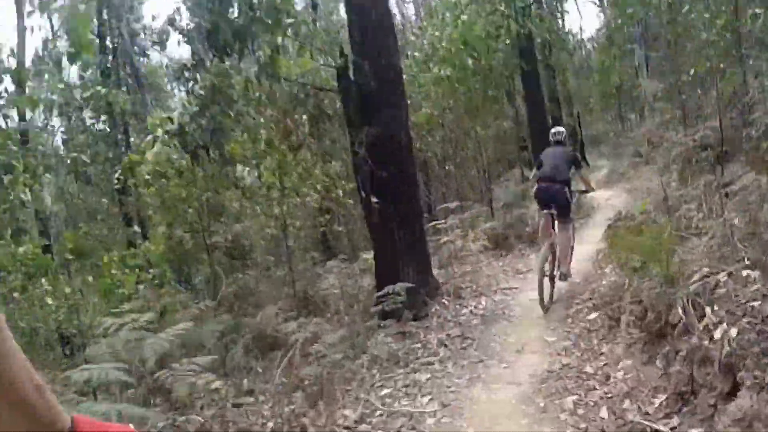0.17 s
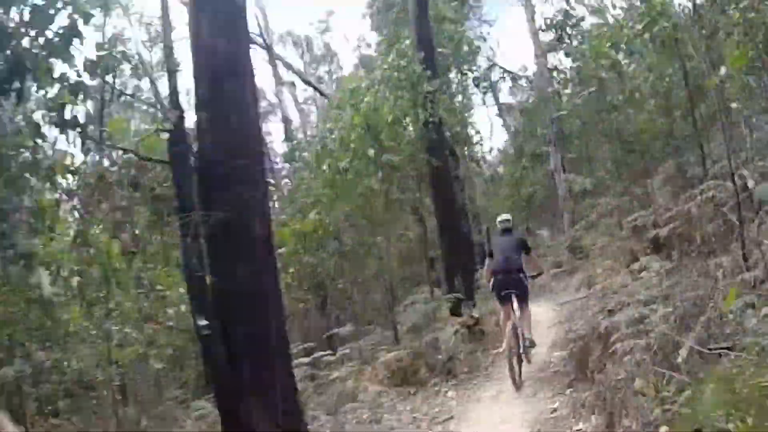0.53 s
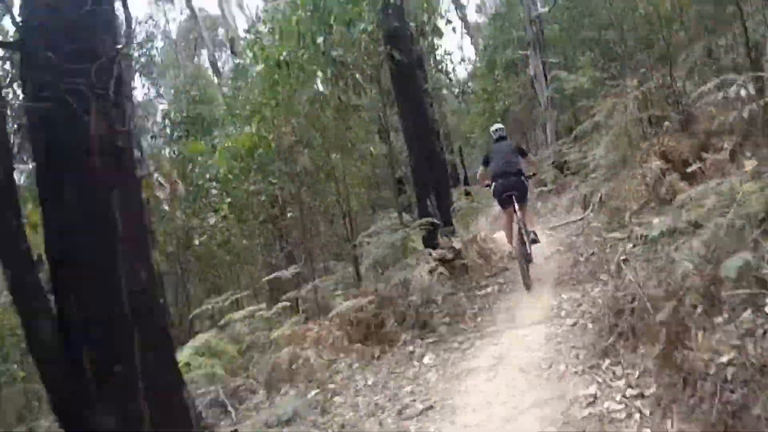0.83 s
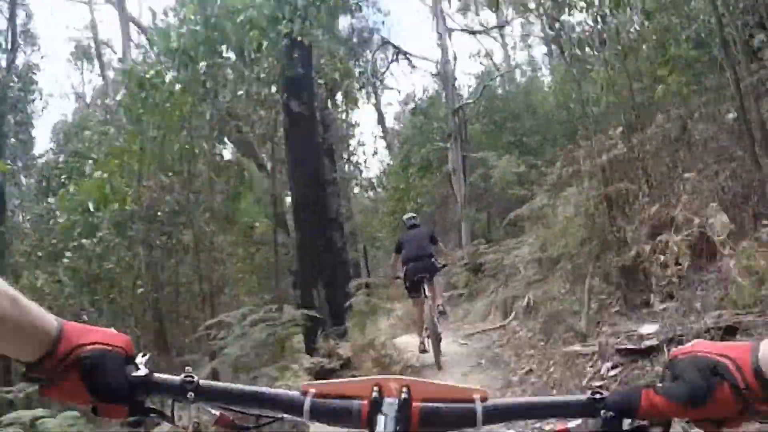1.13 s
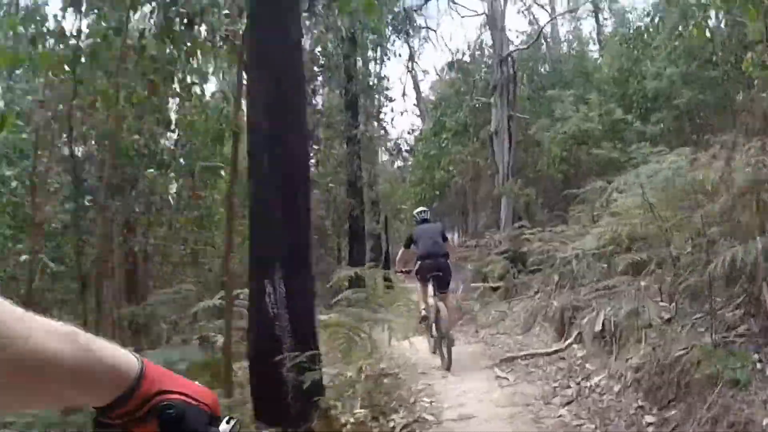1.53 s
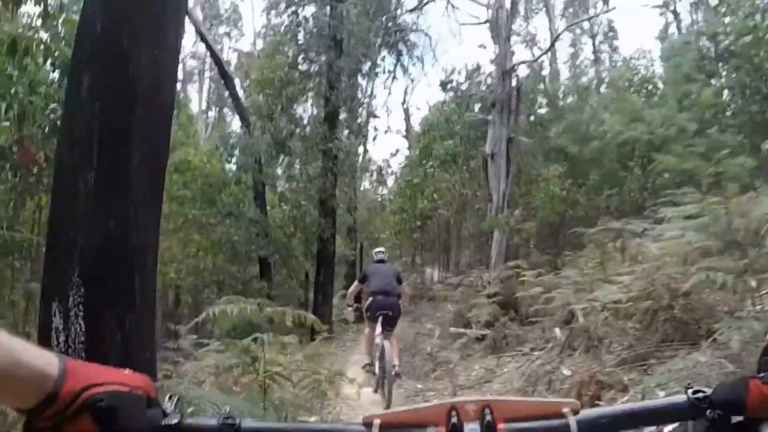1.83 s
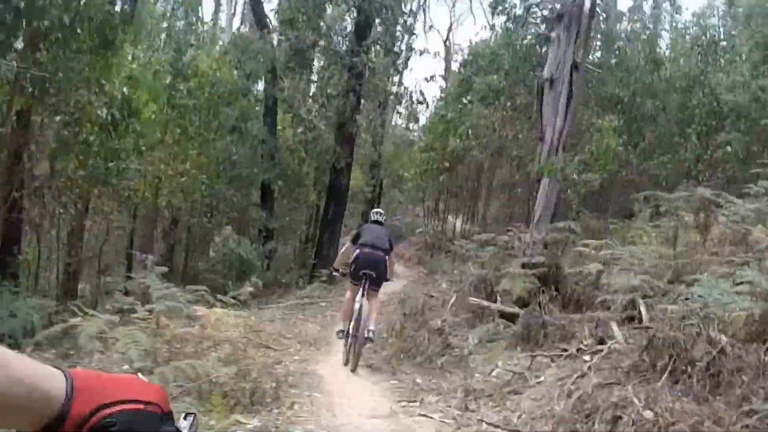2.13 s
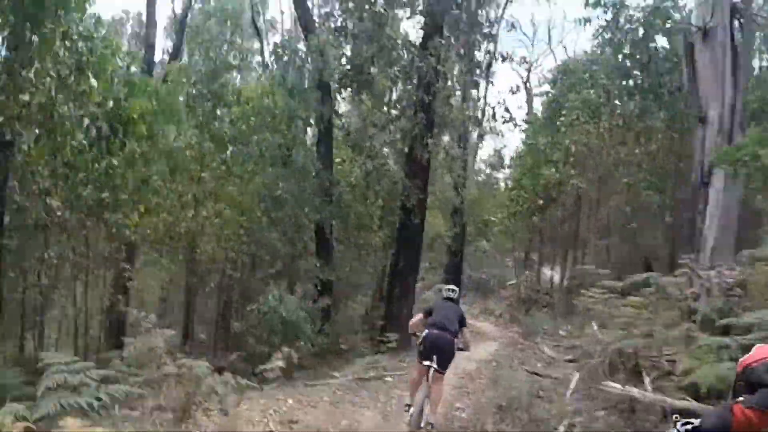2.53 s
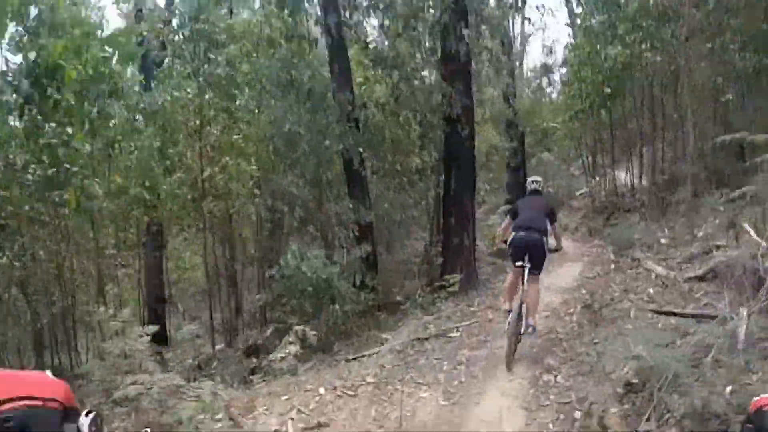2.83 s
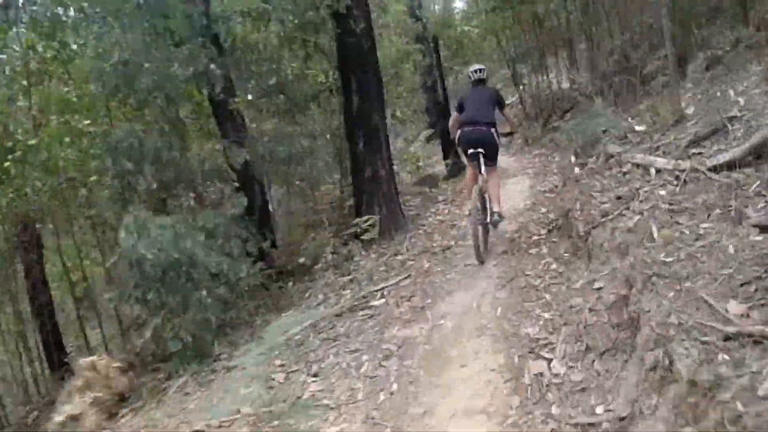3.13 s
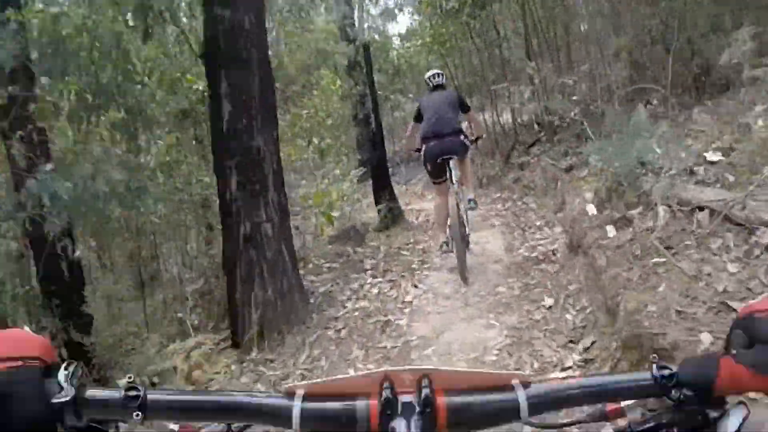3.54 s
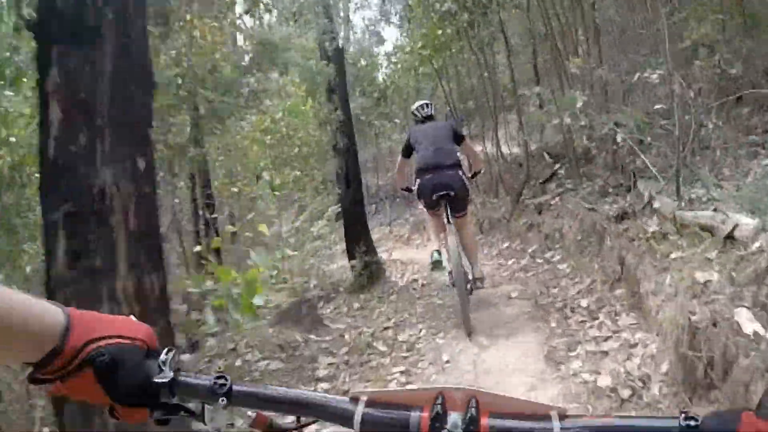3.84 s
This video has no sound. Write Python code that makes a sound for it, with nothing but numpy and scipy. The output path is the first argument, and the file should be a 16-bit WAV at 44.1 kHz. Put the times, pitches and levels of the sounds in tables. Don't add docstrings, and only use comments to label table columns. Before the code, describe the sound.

Mountain bike on a forest trail, close and muffled in a camera case: low wind buffeting, gritty tyres, twig and cable ticks, sudden low bumps and mount knocks, clustered early and again after three seconds.

```python
import sys
import numpy as np
from scipy import signal
from scipy.io import wavfile
from scipy.ndimage import uniform_filter1d

SR = 44100
rng = np.random.default_rng(int(sys.argv[2]) if len(sys.argv) > 2 else 0)


def unload_audio(sound):
    columns = np.transpose(np.atleast_2d(sound))
    steps = np.round(np.clip(columns, -1, 1) * 32767)
    wavfile.write(sys.argv[1], SR, steps.astype(np.int16))


def level_to_linear(level):
    exponent = np.asarray(level, float) / 20
    return 10 ** exponent


N = 174195

# [t/s, level/dB]
GUSTS = [(0, -65.5), (.35, -65.5), (.5, -60), (.7, -64.5), (1.0, -62.5), (1.4, -62.5), (1.65, -65),
         (1.82, -62), (1.95, -66.5), (2.12, -66), (2.45, -66), (2.6, -65.5), (2.85, -66.5), (3.5, -62),
         (3.72, -66.5), (3.95, -67)]
# [f/Hz, level per Hz/dB]
WIND_SPECTRUM = [(4.7, -30), (8.0, 6.5), (37, -1), (51, -23), (82, -17), (545, -41.5), (1000, -41.5),
                 (1300, -74), (2200, -120)]
# [t/s, level/dB]
PEDALLING = [(0, -82.5), (.3, -86), (.7, -86), (.88, -83.5), (1.0, -76.5), (1.09, -79), (1.14, -89.5),
             (2.0, -94.5), (2.9, -93), (3.1, -84.5), (3.4, -77.5), (3.6, -80), (3.95, -79.5)]
# [f/Hz, width/Hz, level/dB]
CHAIN_MODES = [(1670, 260, -12), (1920, 730, -6.5), (2674, 415, 4.5), (3000, 910, -8.5), (3604, 250, 5),
               (4414, 560, -6.5), (5670, 2180, -13.5), (5760, 230, -24), (6640, 320, -7.5),
               (7160, 320, -14), (8780, 780, -22), (10580, 300, -19), (11600, 240, -19),
               (10100, 4800, -28.5)]
# [t/s, level/dB]
ROLLING = [(0.0, -74), (0.36, -71), (1.91, -75), (2.13, -76), (2.55, -74.5), (2.86, -76), (3.15, -71.5),
           (3.34, -70), (3.95, -75.5)]
# [f/Hz, width/Hz, level/dB]
CASE_MODES = [(690, 53, -8.5), (1110, 820, -21.5), (1468, 162, 4), (2146, 153, 3), (2860, 140, -4),
              (3584, 97, 2.5), (4400, 450, -14.5), (5490, 240, -14.5), (6780, 1000, -24), (9700, 4200, -34)]
# [t/s, peak level/dB, treble level/dB, dull f/Hz]
TICKS = [(.085, -57, -75, 2900), (.161, -59, -64, 1600), (.24, -53, -70, 1910), (.272, -47, -59, 1640),
         (.2955, -47, -70, 2090), (.3935, -46, -64, 1580), (.4085, -45, -57, 2220), (.426, -42, -54, 2280),
         (.438, -43, -60, 2200), (.567, -52, -52, 2100), (.594, -70, -60, 2000), (.663, -53, -60, 2900),
         (.698, -52, -58, 2900), (.7565, -51, -48, 1850), (.894, -57, -75, 1520), (.94, -55, -75, 1600),
         (1.128, -61, -57, 2300), (1.291, -66, -63, 2200), (1.4441, -57, -57, 3700),
         (1.597, -57, -70, 2290), (1.7315, -56, -70, 2270), (1.9594, -70, -63, 2200),
         (1.976, -62, -55, 2200), (2.176, -57, -72, 1710), (2.1964, -63, -61, 2600), (2.21, -61, -64, 2600),
         (2.226, -60, -75, 2000), (2.331, -56, -75, 1610), (2.364, -59, -66, 1520),
         (2.3845, -55, -70, 2250), (2.527, -59, -70, 2400), (2.553, -58, -75, 2720),
         (2.722, -60, -72, 1390), (2.7576, -75, -66, 2000), (2.789, -57, -68, 1440),
         (2.856, -54, -65, 2200), (2.868, -56, -61, 2700), (2.974, -63, -65, 2700), (3.002, -60, -62, 2630),
         (3.0485, -61, -64, 2600), (3.077, -59, -66, 1630), (3.2335, -58, -60, 2800),
         (3.259, -46, -63, 2000), (3.301, -41, -60, 2030), (3.3343, -42, -62, 2050),
         (3.449, -45, -48, 2270), (3.544, -58, -70, 1500), (3.918, -60, -61, 2700), (3.929, -54, -70, 2640)]
# [f/Hz, width/Hz, level/dB]
TICK_CASE_MODES = [(1670, 140, -2.3), (2280, 190, -0.33), (2660, 340, -2.0), (3890, 190, 1)]
# [f/Hz, width/Hz, level/dB]
TWIG_MODES = [(3480, 450, 10.5), (4740, 1000, -9.5), (5000, 200, -3), (6700, 1100, 0), (9400, 2900, -10.5),
              (12100, 3400, -25)]
# [t/s, peak level/dB, length/s]
JOLTS = [(0.208, -35.5, 0.015), (0.329, -38, 0.016), (0.529, -28, 0.016), (0.548, -29.5, 0.023),
         (0.593, -31.5, 0.016), (0.663, -46, 0.031), (0.843, -41, 0.016), (0.948, -35.5, 0.023),
         (0.987, -38, 0.024), (1.115, -35.0, 0.018), (1.213, -35.0, 0.02), (1.286, -42, 0.016),
         (1.368, -34.5, 0.034), (1.489, -35, 0.032), (1.575, -39.5, 0.069), (1.783, -27.5, 0.024),
         (1.914, -34.5, 0.029), (2.098, -36.5, 0.026), (2.402, -40.5, 0.024), (2.65, -34, 0.037),
         (2.977, -40.5, 0.025), (3.174, -46, 0.038), (3.309, -40, 0.0082), (3.402, -39.5, 0.01),
         (3.432, -37, 0.02), (3.482, -27.5, 0.015), (3.597, -32.5, 0.018), (3.687, -39, 0.031)]
# [t/s, peak level/dB, length/s]
PULL = (0.46, -34, 0.022)
# [start t/s, length/s, level/dB]
RUBS = [(0.228, 0.037, -61.5), (0.276, 0.032, -62.5), (0.388, 0.062, -56.5), (0.403, 0.034, -54.5),
        (0.448, 0.067, -64), (0.519, 0.029, -57.5), (0.551, 0.029, -62.5), (1.181, .049, -68),
        (1.288, .03, -67.5), (1.344, 0.039, -69), (1.591, 0.021, -65), (1.651, 0.033, -66),
        (1.725, 0.048, -62), (1.77, 0.028, -58.5), (1.811, 0.053, -64), (1.874, 0.013, -67),
        (1.899, 0.069, -64), (1.976, 0.036, -66), (2.158, .07, -74.5), (2.32, 0.011, -74),
        (2.353, 0.046, -70), (2.495, 0.025, -70.5), (2.53, 0.085, -69.5), (2.688, 0.028, -86),
        (2.85, 0.029, -66.5), (2.952, 0.061, -71), (3.229, 0.071, -67.5), (3.276, 0.11, -64),
        (3.39, 0.029, -62.5), (3.436, 0.033, -59), (3.541, 0.054, -68), (3.938, 0.042, -63)]
# [f/Hz, width/Hz, level/dB]
SCRAPE_MODES = [(170, 67, 6), (333, 24, -7.5), (626, 39, 1), (1113, 1280, -4), (1660, 590, 0.5),
                (2213, 180, 3.5), (2886, 200, 0.5), (3770, 330, -7), (4400, 520, -14.5), (5100, 380, -15.5),
                (6250, 1400, -19.5), (12000, 1800, -36)]
# [t/s, peak level/dB, f/Hz, crack level/dB]
KNOCKS = [(.297, -46.5, 248, -49), (0.514, -43.5, 80.5, -74), (0.587, -40, 170, -60),
          (1.306, -45, 181, -53), (1.4212, -38.5, 208, -45.5), (1.774, -37, 83.4, -70),
          (1.786, -40, 98, -77), (1.987, -41.5, 206, -52), (2.778, -85, 108, -87), (3.302, -53, 115, -76),
          (3.333, -43, 190, -77), (3.472, -42.5, 68.5, -80)]


def curve(table):
    return np.interp(np.arange(N) / SR, *np.array(table).T[:2])


def unit(x):
    return x / np.sqrt(np.mean(x ** 2))


def ring(x, hz, width_hz):
    return signal.lfilter(*signal.iirpeak(hz, hz / width_hz, fs=SR), x)


def body(x, modes):
    return sum((-1) ** k * level_to_linear(db) * ring(x, hz, width) for k, (hz, width, db) in enumerate(modes))


def walk(rate):
    hold = int(SR / rate)
    steps = np.repeat(rng.standard_normal(N // hold + 1), hold)
    smooth = uniform_filter1d(uniform_filter1d(steps, hold), hold)
    return unit(smooth[:N])


def grains(rate, spread_db, bed):
    struck = rng.random(N) < rate / SR
    sign = rng.standard_normal(N)
    size = np.minimum(rng.exponential(size=N), 3.5)
    return unit(struck * sign * level_to_linear(spread_db * size)) + bed * rng.standard_normal(N)


def drift(x, hz, width_hz):
    wander = 0.03 * walk(12)
    carrier = np.exp(2j * np.pi * np.cumsum(hz * (1 + wander)) / SR)
    decay = np.exp(-np.pi * width_hz / SR)
    envelope = signal.lfilter([1 - decay], [1, -decay], x / carrier)
    return 2 * np.real(carrier * envelope)


def wind():
    shared_db, flutter_db, level_db = 1.8, 2, 15.5
    table_hz, table_db = np.array(WIND_SPECTRUM).T
    gusting = shared_db * walk(18)
    out = np.zeros(N)
    for hz in 11 * 2 ** np.arange(0, 6.6, .5):
        db = np.interp(np.log(hz), np.log(table_hz), table_db) + gusting + flutter_db * walk(30)
        band = ring(ring(rng.standard_normal(N), hz, hz / 2), hz, hz / 2)
        out += level_to_linear(db) * band
    return unit(out) * level_to_linear(curve(GUSTS) + level_db)


def drivetrain():
    links_per_s, link_spread_db, link_flutter_db = 1200, 1.2, 1.9
    level_db, flicker_db = 14, 1
    out = np.zeros(N)
    for hz, width, db in CHAIN_MODES:
        links = grains(links_per_s, link_spread_db, 0.63)
        out += level_to_linear(db + link_flutter_db * walk(60)) * ring(ring(links, hz, width), hz, width)
    return unit(out) * level_to_linear(curve(PEDALLING) + level_db + flicker_db * walk(50))


def tyres():
    grit_per_s, patchy_db, crunch_db = 1500, 2, 1.7
    grit = grains(grit_per_s, 1.0, 0.81)
    out = np.zeros(N)
    for k, (hz, width, db) in enumerate(CASE_MODES):
        patches = level_to_linear(db + patchy_db * walk(40))
        out += (-1) ** k * patches * drift(grit, hz, width)
    return unit(out) * level_to_linear(curve(ROLLING) + crunch_db * walk(29.85))


def ticks():
    tick_db, treble_trim_db, decay_s = -1, -8, .0035
    click, smear = 6, .7
    pitch_db, pitch_width_hz, dull_top_hz = 5, 186, 4500
    dull, own, bright = np.zeros(N), np.zeros(N), np.zeros(N)
    n = int(.02 * SR)
    t = np.arange(n) / SR
    shape = np.tanh(t * 3000) * np.exp(-t / decay_s)
    for s, db, treble_db, hz in TICKS:
        burst = rng.standard_normal(n) * shape
        i = int(s * SR)
        dull[i:i + n] += level_to_linear(db + tick_db) * smear * burst
        dull[i + 20] += level_to_linear(db + tick_db) * click
        own[i:i + n] += level_to_linear(db + pitch_db) * .3 * unit(ring(burst, hz, pitch_width_hz))
        bright[i:i + n] += level_to_linear(treble_db + treble_trim_db) * burst
    conducted = level_to_linear(9.5) * body(dull, TICK_CASE_MODES) + level_to_linear(-11) * own
    soft = signal.butter(2, dull_top_hz, fs=SR)
    return signal.lfilter(*soft, conducted) + level_to_linear(9.5) * body(bright, TWIG_MODES)


def jolts():
    rebound, mount_hz, mount_width_hz, swing_db = 0.66, 16, 14, -7
    t, push = np.arange(N) / SR, np.zeros(N)
    for s, db, length in JOLTS:
        u = (t - s) / length
        dip = (1 + rebound) * np.exp(-(u / 0.62) ** 2)
        push += level_to_linear(db) * (rebound * np.exp(-(u / 1.41) ** 2) - dip)
    pull_s, pull_db, pull_length = PULL
    push += level_to_linear(pull_db) * np.exp(-((t - pull_s) / pull_length) ** 2)
    late = np.roll(push, int(.03 * SR))
    return push - level_to_linear(swing_db) * ring(late, mount_hz, mount_width_hz)


def straps():
    slips_per_s, edge_s, swell_db, top_hz = 2500, .012, 4, 14100
    t, rubbing = np.arange(N) / SR, np.zeros(N)
    for s, length, db in RUBS:
        to_edge = np.minimum(t - s, s + length - t)
        gate = np.clip(to_edge / edge_s + .5, 0, 1)
        swell = level_to_linear(swell_db * np.clip((t - s) / length - .7, -1, 0))
        rubbing += level_to_linear(db) * gate * swell
    slips = grains(slips_per_s, 0.75, 0.47) * level_to_linear(0.79 * walk(150))
    soft = signal.butter(2, top_hz, fs=SR)
    scraped = signal.lfilter(*soft, body(rubbing * slips, SCRAPE_MODES))
    return scraped / np.std(body(slips, SCRAPE_MODES))


def swing(cycles):
    rise, decay = 0.08, .75
    return np.sin(2 * np.pi * cycles) * np.tanh(cycles / rise) * np.exp(-(cycles / decay) ** 2)


def knocks():
    crack_hz = 765
    t, out = np.arange(N) / SR, np.zeros(N)
    for s, db, hz, crack_db in KNOCKS:
        age = np.clip(t - s, 0, 1)
        out += level_to_linear(db - 0.5) * swing(age * hz) + level_to_linear(crack_db) * swing(age * crack_hz)
    return out


def scene():
    mix = wind() + drivetrain() + tyres() + ticks() + jolts() + straps() + knocks()
    return mix[None]


def band_limit(x):
    return signal.sosfilt(signal.butter(12, 14300, fs=SR, output="sos"), x)


def record(dry):
    hiss_db = -100
    mix = dry + level_to_linear(hiss_db) * rng.standard_normal(dry.shape)
    return band_limit(mix)


dry = scene()
out = record(dry)
unload_audio(out)
```